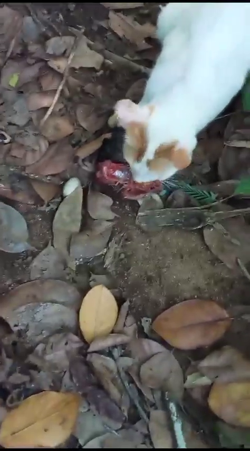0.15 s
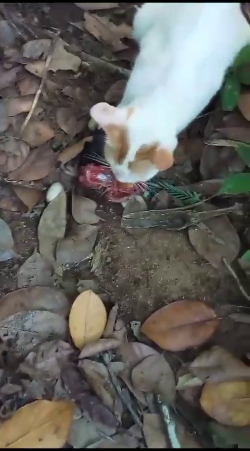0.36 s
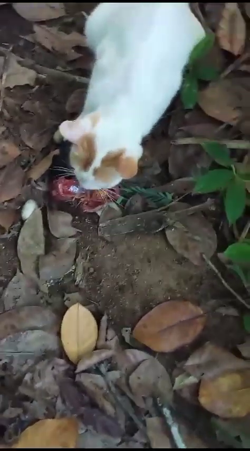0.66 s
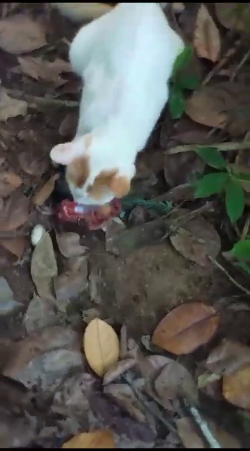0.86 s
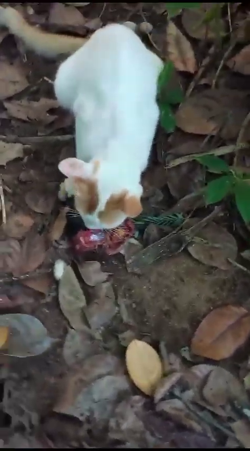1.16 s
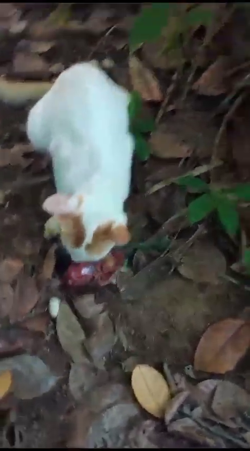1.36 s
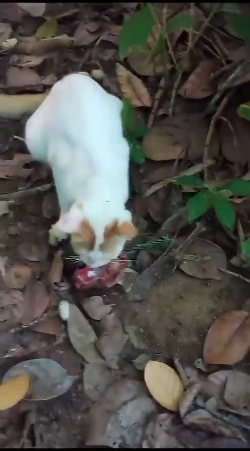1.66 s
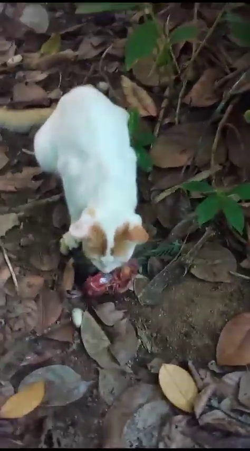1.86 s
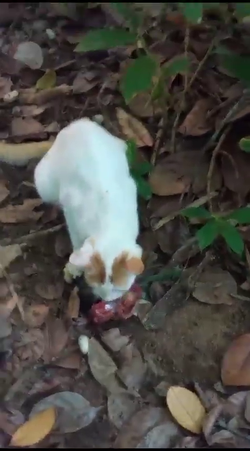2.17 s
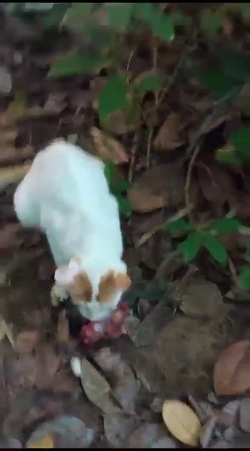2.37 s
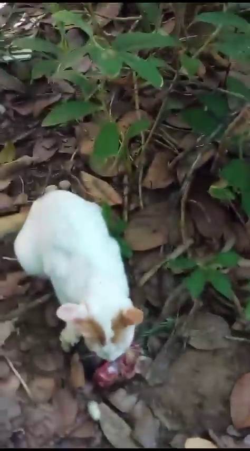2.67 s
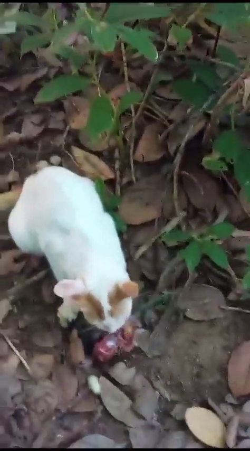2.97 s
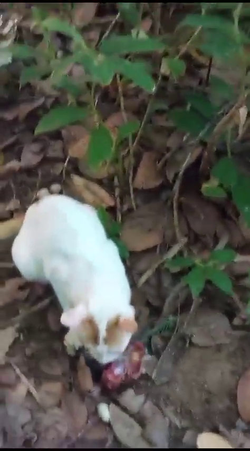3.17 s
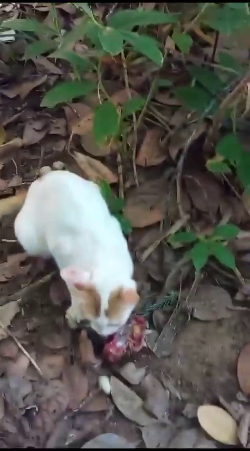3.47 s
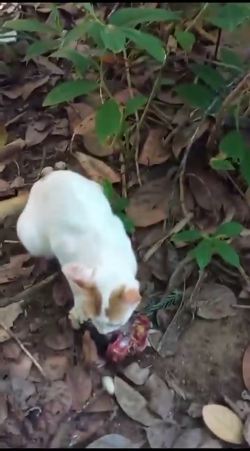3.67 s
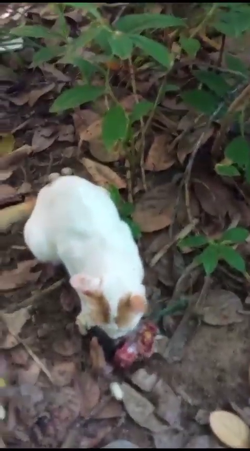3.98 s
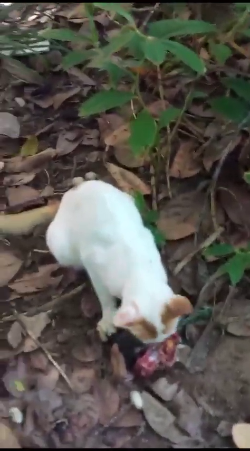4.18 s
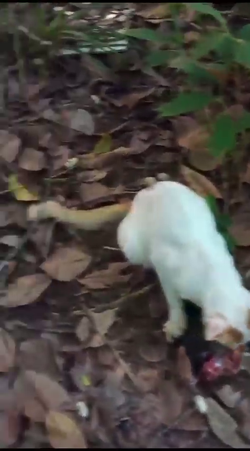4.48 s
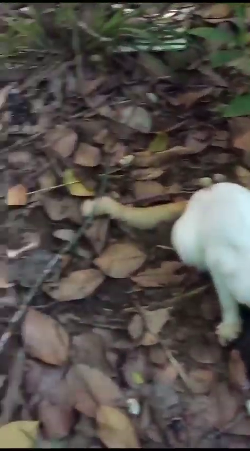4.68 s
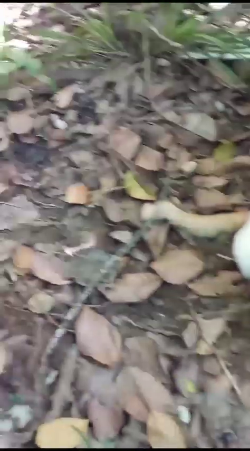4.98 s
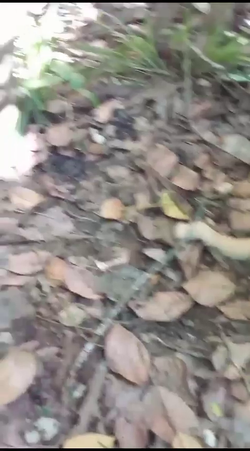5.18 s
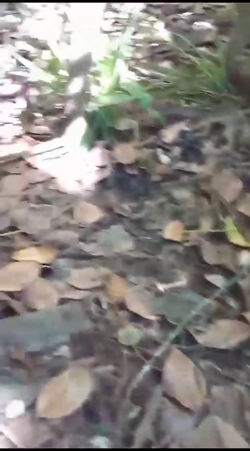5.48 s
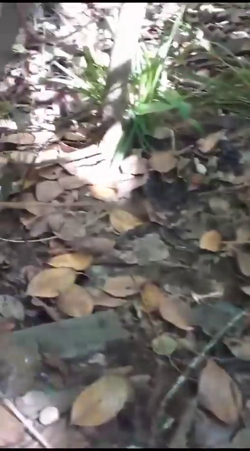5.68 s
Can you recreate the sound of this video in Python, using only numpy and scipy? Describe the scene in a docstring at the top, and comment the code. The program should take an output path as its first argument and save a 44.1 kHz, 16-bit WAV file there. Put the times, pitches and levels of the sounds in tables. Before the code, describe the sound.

Something dry rubs and crackles very close to the microphone as a cat works at its catch on a woodland floor; it could be leaf litter or a shifting grip. Hissy scrapes and soft brushes start at once, with a cluster of sharp snaps around 0.6 seconds. Lighter rustling follows, with another snap at 1.5 seconds. At 2.1 seconds comes the loudest sound, a single sharp knock on the microphone's case with a short low thud and a trailing rub. More scrapes and snaps come near 2.7, 3.1 and 3.3 seconds, then thin to a few faint ticks after 3.5 seconds. Behind it all, insects chirr quietly, high and steady, over a low outdoor rumble. Very faint distant calls sound near 0.8, 1.9, 2.8 and 5.6 seconds. From about 4.8 seconds one insect stands out slightly until the end, just before six seconds.

```python
"""Something dry rubs and crackles very close by as a cat works at its catch on a woodland floor.
It is leaf litter, or a grip shifting on a hand-held camera: stick-slip friction gives the ticks and
hiss, and small stiff patches snap and ring. The camera's case takes a few soft brushes and one knock.
Behind it insects chirr steadily over a low outdoor rumble, with a few faint far-off calls."""
import sys
import numpy as np
from scipy import signal
from scipy.fft import rfft, irfft
from scipy.io import wavfile

SR = 44100
rng = np.random.default_rng(int(sys.argv[2]) if len(sys.argv) > 2 else 0)


def persist_wave(psi):
    """Save psi, clipped to +-1, as 16-bit WAV."""
    counts = np.round(np.clip(psi, -1, 1) * 32767).astype(np.int16)
    wavfile.write(sys.argv[1], SR, np.atleast_2d(counts).T)


N = 256662


def amp(db):
    """Amplitude ratio of a level in decibels."""
    return 10 ** (np.asarray(db) / 20)


def unit_rms(x):
    """Normalisation to an rms of 1."""
    return x / np.sqrt(np.mean(x ** 2) + 1e-20)


def curve(rows):
    """Linear interpolation of (seconds, value) points at every sample."""
    return np.interp(np.arange(N) / SR, *np.transpose(rows))


def colour(x, points):
    """Spectral shaping by (Hz, dB) points, joined on a logarithmic frequency axis."""
    point_hz, db = np.transpose(points)
    hz = np.fft.rfftfreq(len(x), 1 / SR)
    return irfft(rfft(x) * amp(np.interp(np.log(hz + 1), np.log(point_hz + 1), db)), len(x))


def band(x, lo_hz, hi_hz, order=2):
    """Causal band-pass filtering."""
    return signal.lfilter(*signal.butter(order, [lo_hz, hi_hz], "band", fs=SR), x)


def resonate(x, hz, width_hz):
    """Forced response of a damped resonator."""
    return signal.lfilter(*signal.iirpeak(hz, hz / width_hz, fs=SR), x)


def drift(per_s):
    """Slow random modulation of rms 1."""
    knots = rng.standard_normal(2048)
    return unit_rms(np.interp(np.arange(N) * per_s / SR, np.arange(len(knots)), knots))


def add(mix, start_s, sound):
    """Superposition of a sound on the mix, from start_s on."""
    part = mix[round(start_s * SR):][:len(sound)]
    part += sound[:len(part)]


def air(wash_db=-60.5, rumble_hz=190, hiss_db=-72, hiss_follow=.7):
    """Broadband ambient noise: a steady rumble under a middle range and a hiss that swell together."""
    # Each row: frequency in Hz, relative spectral density in dB.
    wash_spectrum = [(15, -42.5), (25, -11), (70, 1), (118, -3.5), (167, -15.5), (258, -17.5), (445, -25),
                     (592, -22.5), (1240, -32), (1360, -33), (2440, -38), (3240, -43.5), (4120, -35.5),
                     (4600, -43), (5980, -74.5), (10100, -120)]
    hiss_spectrum = [(3000, -14.5), (4500, -3), (6000, 5.5), (8500, -3.5), (10000, -5.5), (12000, -6),
                     (16000, -9)]
    # Each row: time in seconds, gain of the middle range in dB.
    swell_points = [(0, 12.5), (1.0, 4.5), (1.3, 6.5), (2.9, 5.2), (3.5, 5.5), (3.65, 8.7), (4.15, 8),
                    (4.6, 5.4), (5.2, 4.9), (5.8, 5.8)]
    swell_db = curve(swell_points)
    wash = amp(wash_db) * unit_rms(colour(rng.standard_normal(N), wash_spectrum))
    rumble = signal.sosfiltfilt(signal.butter(2, rumble_hz, fs=SR, output="sos"), wash)
    hiss = unit_rms(colour(rng.standard_normal(N), hiss_spectrum))
    return rumble + amp(swell_db) * (wash - rumble) + amp(hiss_db + hiss_follow * swell_db) * hiss


def far_calls(blur_hz=70):
    """Scattering by the trees smears each distant gliding tone into a narrow band."""
    # Each row: start and length in seconds, first and last frequency in Hz, level in dB.
    calls = [(0.804, 0.37, 610, 633, -73.5), (1.86, 0.28, 853, 862, -67.5), (2.781, 0.13, 566, 564, -69),
             (5.55, .22, 2520, 2490, -81), (5.65, 0.16, 4180, 4210, -78), (5.75, .1, 4020, 3750, -79)]
    out = np.zeros(N)
    for start_s, length_s, first_hz, last_hz, db in calls:
        size = int(length_s * SR)
        tone = np.exp(2j * np.pi * np.cumsum(np.linspace(first_hz, last_hz, size)) / SR)
        scatter = drift(blur_hz)[:size] + 1j * drift(blur_hz)[:size]
        add(out, start_s, amp(db) * unit_rms((tone * scatter).real * signal.windows.tukey(size, .5)))
    return out


def chirr(hz, width_hz, waver_db=1.5, buzz_depth=.22, buzz_hz=124):
    """Amplitude modulation by wing strokes puts a light buzz on a wavering band of noise."""
    song = unit_rms(resonate(resonate(rng.standard_normal(N), hz, width_hz), hz, width_hz))
    wing_cycles = np.cumsum(buzz_hz * (1 + .083 * drift(3.9))) / SR
    return song * amp(waver_db * drift(18)) * (1 + buzz_depth * np.sin(2 * np.pi * wing_cycles))


def insects():
    """Many insects sum incoherently into a few bands; one singer stands out toward the end."""
    # Each row: centre frequency and width in Hz, relative level in dB.
    bands = [(5590, 340, -4.5), (6140, 560, -2.5), (6845, 420, -1.5), (7320, 990, -11.5),
             (7610, 260, -16.5)]
    # Each row: time in seconds, level in dB.
    chorus_levels = [(0, -56), (1.25, -61), (3.0, -65.5), (3.8, -63.5), (4.4, -63), (4.9, -61.5),
                     (5.4, -59.5), (5.8, -60)]
    singer_levels = [(0, -97), (2.0, -77), (4.3, -88), (4.8, -69), (5.5, -65.5), (5.8, -64)]
    chorus = unit_rms(sum(amp(db) * chirr(hz, width_hz) for hz, width_hz, db in bands))
    singer = chirr(hz=6466, width_hz=100)
    return amp(curve(chorus_levels)) * chorus + amp(curve(singer_levels)) * singer


def brushes():
    """Structure-borne sound: soft contacts lose their treble on the way through the camera's case."""
    # Each row: start and length in seconds, level in dB.
    contacts = [(0.265, 0.099, -48), (0.334, 0.21, -55), (0.582, 0.18, -57.5), (1.479, 0.046, -55.5)]
    # Each row: frequency in Hz, relative spectral density in dB.
    case_spectrum = [(25, -3), (70, 1), (130, -0.5), (180, -9.5), (300, -6), (450, -9.5), (900, -18),
                     (3000, -72)]
    envelope = np.zeros(N)
    for start_s, length_s, db in contacts:
        add(envelope, start_s, amp(db) * signal.windows.tukey(int(length_s * SR), .7))
    return envelope * unit_rms(colour(rng.standard_normal(N), case_spectrum))


def knock(at_s=2.1094, thud_db=-17.5, push_s=.0014, push_db=-11, rattle_db=-22, rattle_t60=.035):
    """Impact excitation: a short push on the case starts a dry rattle and a thud of damped modes."""
    # Each row: frequency in Hz, relative level in dB, time to decay by 60 dB in seconds.
    modes = [(61.1, 4.5, 0.084), (122, -3.5, 0.078), (253, -10.5, 0.035), (521, -18, 0.013),
             (3970, 1, 0.011)]
    out, t = np.zeros(N), np.arange(SR // 4) / SR
    thud = sum(amp(db - 60 * t / t60) * np.sin(2 * np.pi * hz * t) for hz, db, t60 in modes)
    push = -np.sin(np.pi * np.minimum(t / push_s, 1)) ** 2
    rattle = unit_rms(band(rng.standard_normal(len(t)), 2000, 16000, order=1))
    add(out, at_s - .0016, amp(push_db) * push + amp(rattle_db - 60 * t / rattle_t60) * rattle)
    add(out, at_s, amp(thud_db) * thud)
    return out


def crackles(rubbing_db, per_s=11, offset_db=-10, follow=.74, spread_db=2.5):
    """A random point process: rows of small snaps, stronger where the rubbing is stronger."""
    count = int(per_s * N / SR)
    when, size, lowest, ring = rng.random((count, 4)).T
    at = ((np.arange(count) + when) / count * N).astype(int)
    db = offset_db + follow * rubbing_db[at] + spread_db * (2 * size - 1)
    lowest_hz = np.interp(lowest, [0, 1], [3000, 8000])
    ring_hz = np.interp(ring, [0, 1], [8580, 14000])
    return list(zip(at / SR, db, lowest_hz, ring_hz))


def snaps(small_snaps, crack_s=.00034, tail_s=.0026, tail_db=-19, mode_gain=.26, leak_db=-24):
    """A sudden crack excites a small stiff patch, which radiates little below its lowest mode."""
    # Each row: time in seconds, level over 4 ms in dB, lowest mode and strongest ring in Hz.
    loud_snaps = [(0.3851, -28.5, 1900, 9700), (0.5288, -29, 5800, 13200), (0.542, -24, 6000, 12800),
                  (0.6301, -23, 11300, 12200), (0.6375, -19, 1800, 7400), (0.6397, -19.5, 3300, 6900),
                  (0.6495, -27, 3800, 7300), (0.6605, -19.5, 3700, 7400), (0.6689, -22, 8300, 14200),
                  (0.7196, -22.5, 4300, 5800), (0.7593, -29, 8000, 14200), (0.9154, -31, 4500, 11000),
                  (0.9554, -35, 5000, 14100), (1.0724, -34, 4500, 13100), (1.3108, -36, 2800, 9000),
                  (1.3491, -46, 3000, 8400), (1.4949, -24, 4800, 13400), (1.6254, -34, 6800, 14000),
                  (1.6338, -36, 5500, 10700), (1.6937, -35, 5300, 9500), (1.6984, -37, 4800, 9100),
                  (1.7365, -44, 4000, 10500), (1.8615, -42, 1700, 3000), (2.0587, -33, 4500, 11500),
                  (2.108, -14.5, 2200, 10700), (2.2866, -24.5, 7000, 10200), (2.5002, -34, 3300, 10100),
                  (2.7123, -27, 4300, 12000), (2.8037, -36, 2800, 8600), (2.8807, -40, 2300, 4100),
                  (2.8854, -37, 4300, 10800), (2.9632, -38, 7800, 12800), (3.0108, -38, 8500, 12200),
                  (3.1113, -26, 4300, 8300), (3.1201, -26, 4000, 10700), (3.2432, -38, 7000, 11600),
                  (3.3443, -23.5, 3800, 12200), (3.4424, -36, 10000, 13600), (3.4566, -40, 1700, 6700),
                  (3.9879, -45, 4500, 14200), (4.0423, -53, 6800, 14500), (4.2136, -50, 4000, 12800),
                  (4.2949, -50, 5800, 12700), (4.9864, -56, 4000, 8100)]
    out, t = np.zeros(N), np.arange(1024) / SR
    envelope = np.exp(-t / crack_s) + amp(tail_db) * np.exp(-t / tail_s)
    energy_scale = np.sqrt(.004 * SR / len(t))  # refers the level to 4 ms
    for at_s, db, lowest_hz, ring_hz in loud_snaps + small_snaps:
        crack = rng.choice([-1, 1], len(t)) * envelope
        snap = unit_rms(resonate(crack, ring_hz, width_hz=4800)) + unit_rms(crack)
        snap = unit_rms(band(snap, .72 * lowest_hz, 15800, order=3))
        snap += mode_gain * unit_rms(resonate(crack, lowest_hz, lowest_hz / 2))
        snap += amp(leak_db) * unit_rms(band(crack, 770, 4600, order=1))
        add(out, max(at_s - .0002, 0), amp(db) * energy_scale * unit_rms(snap))
    return out


def ticks(per_s, spread_db):
    """Shot noise: impulses at random moments, their sizes following a power law."""
    when, size, sign = rng.random((32768, 3))[:int(per_s * N / SR)].T
    size_db = -spread_db * np.log(np.maximum(size, .02))
    out = np.zeros(N)
    out[(when * N).astype(int)] = np.sign(sign - .5) * amp(size_db)
    return unit_rms(out)


def stroke_levels(rounding_db=5):
    """Incoherent strokes add in power, giving the treble and body levels of the rubbing in dB."""
    # Each row: peak time, time to swell 20 dB and time to fade 20 dB in seconds, treble level in dB,
    # body relative to the treble in dB (higher when pressed harder).
    strokes = [(0.065, .077, .13, -37.5, -14), (0.157, .016, .13, -40.5, -11), (0.206, .015, .11, -40, -6),
               (0.302, .05, .17, -35.5, -11), (0.385, .016, .27, -41, -4), (0.533, .10, .035, -31, -12),
               (0.583, .033, .18, -30.6, -12), (0.643, .018, .065, -26, -17), (0.793, .024, 1.0, -54, -11),
               (0.959, .21, .06, -42, -16), (1.145, .25, 0.05, -51.3, -8), (1.58, .15, .06, -40.2, -10.5),
               (1.87, .24, .5, -48.5, -17), (1.959, .043, .06, -34.5, -15), (2.083, .12, .02, -38.8, -24),
               (2.11, .005, .21, -26.3, -17), (2.21, .05, .58, -32.5, -23), (2.679, .065, .19, -33, -11),
               (2.916, .085, .045, -44.6, -17), (3.108, .035, .075, -25.2, -12),
               (3.273, .22, .27, -46.6, -12), (3.456, .42, .04, -49.2, -19), (3.63, .045, .30, -56.5, -22),
               (4.237, .45, .15, -64.5, -20), (4.62, .22, .15, -67.5, -11)]
    t = np.arange(0, N / SR, .001)
    peak_s, swell_s, fade_s, peak_db, relative_body_db = np.transpose(strokes)[:, :, None]
    drop_db = 20 * np.maximum((peak_s - t) / swell_s, (t - peak_s) / fade_s)
    treble_db = peak_db + rounding_db - np.hypot(drop_db, rounding_db)  # rounds off each peak
    powers = [(amp(db) ** 2).sum(0) for db in (treble_db, treble_db + relative_body_db)]
    return [curve(np.c_[t, 10 * np.log10(power + 1e-12)]) for power in powers]


def rubbing(treble_db, body_db, ring_gain=.71, patch_q=10, shift_db=3.5, clump_db=2, tick_follow=.79):
    """Stick-slip friction: fine ticks and hiss fizz and scrape; coarser slips ring small dry patches."""
    # Each row: frequency in Hz, relative spectral density in dB.
    fizz_spectrum = [(1000, -41.5), (2500, -10), (3300, -4), (3950, -3), (4600, -1.5), (6200, -7),
                     (7200, 3), (8500, 1), (10500, 4.5), (12000, 5), (15500, 4.5), (17000, 12)]
    scrape_spectrum = [(80, -15), (250, -9.5), (550, -6.5), (1100, -4.5), (1500, -3.5), (1950, -2),
                       (2400, -5.5), (3200, -5.5), (4000, -3.5), (7000, -6.5), (16000, -45)]
    fine = unit_rms(ticks(per_s=2600, spread_db=3.9) + .6 * rng.standard_normal(N))
    patches = np.zeros(N)
    for hz in np.geomspace(1200, 14500, num=14):
        patch = unit_rms(resonate(ticks(per_s=190, spread_db=3.4), hz, hz / patch_q))
        patches += patch * np.sqrt(hz) * amp(shift_db * drift(16))  # the contact wanders among patches
    grain = unit_rms((fine + ring_gain * unit_rms(patches)) * amp(clump_db * drift(150)))
    fizz = amp(treble_db) * unit_rms(colour(grain, fizz_spectrum))
    scrape = amp(body_db + .5) * unit_rms(colour(grain, scrape_spectrum))
    # A light touch breaks up into separate ticks, so these fade more slowly than the hiss.
    sparse_ticks = unit_rms(band(ticks(per_s=130, spread_db=3.2), 7500, 15500))
    return fizz + scrape + amp(tick_follow * treble_db - 19) * sparse_ticks


def scene():
    """Superposition of the close, dry sounds and the woodland background in one channel."""
    treble_db, body_db = stroke_levels()
    close = rubbing(treble_db, body_db) + snaps(crackles(treble_db)) + brushes() + knock()
    return (close + insects() + air() + far_calls())[None]


def record(dry, low_cut_hz=38, ceiling=.9, band_limit_hz=15880):
    """Transduction: the microphone's low cut, then hard clipping and a band limit."""
    heard = signal.lfilter(*signal.butter(2, low_cut_hz, "high", fs=SR), dry)
    heard = np.clip(heard, -ceiling, ceiling)
    low_pass = signal.firwin(501, band_limit_hz, window=("kaiser", 8), fs=SR)
    return signal.oaconvolve(heard, low_pass[None], "same")


dry = scene()
out = record(dry)
persist_wave(out)
```